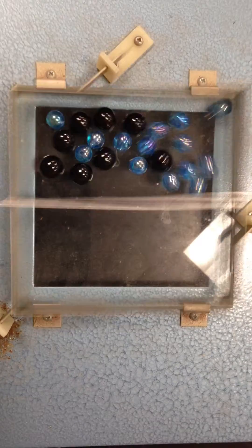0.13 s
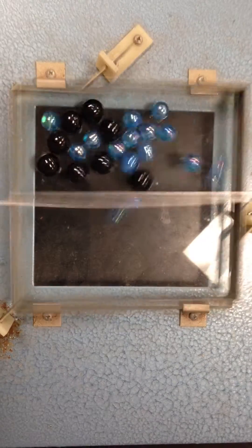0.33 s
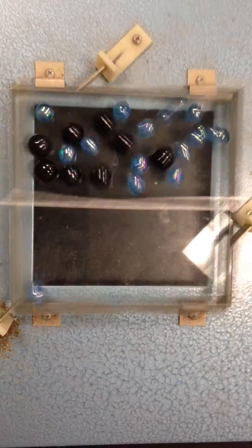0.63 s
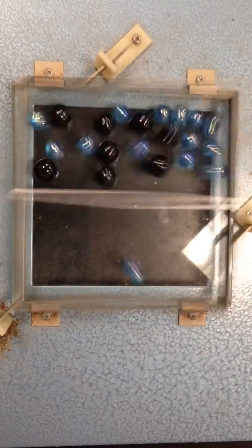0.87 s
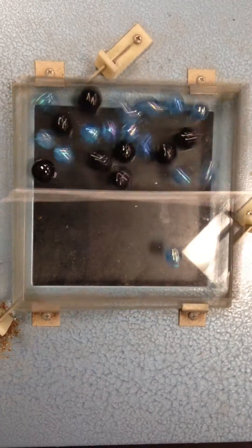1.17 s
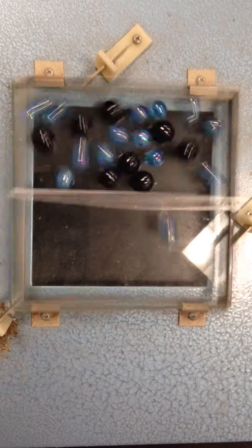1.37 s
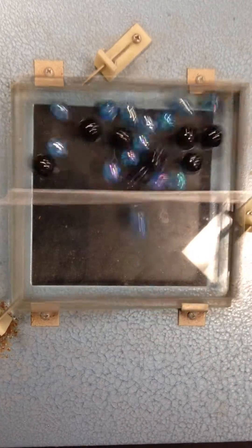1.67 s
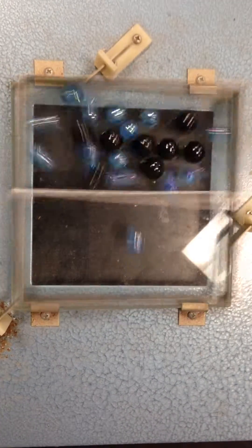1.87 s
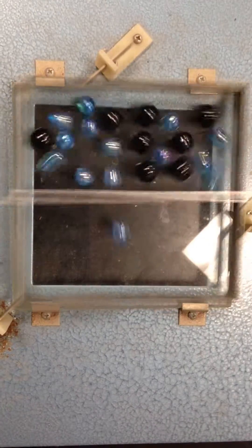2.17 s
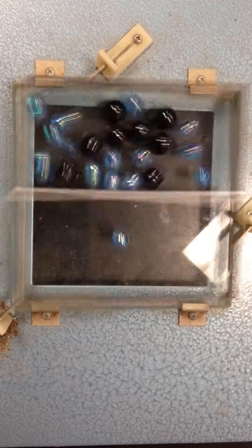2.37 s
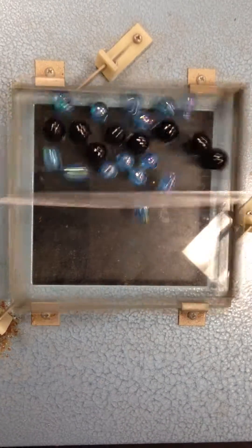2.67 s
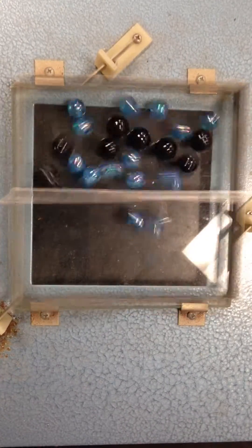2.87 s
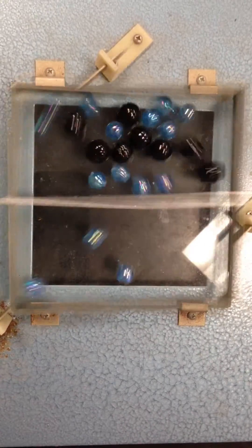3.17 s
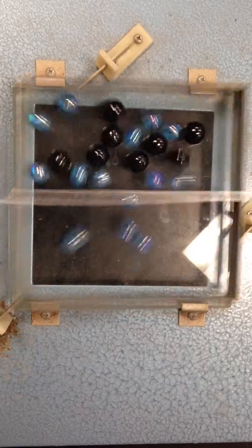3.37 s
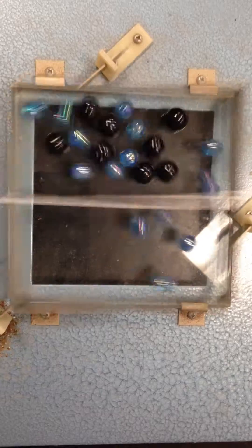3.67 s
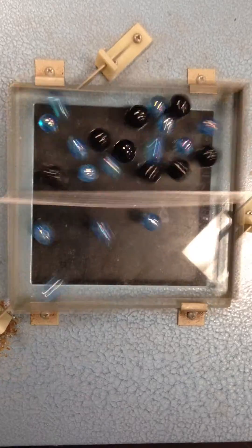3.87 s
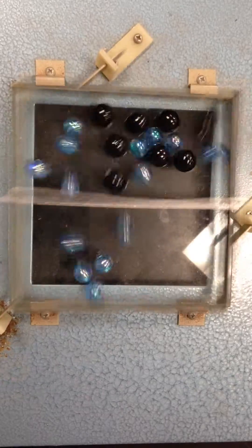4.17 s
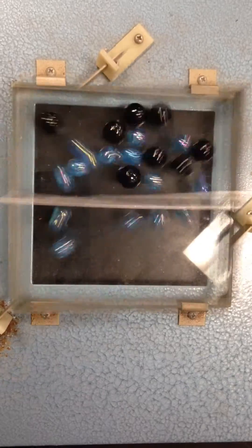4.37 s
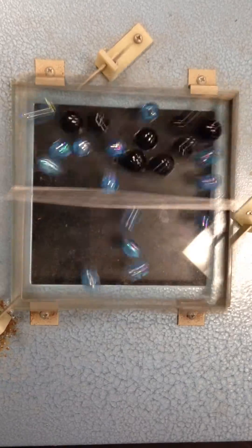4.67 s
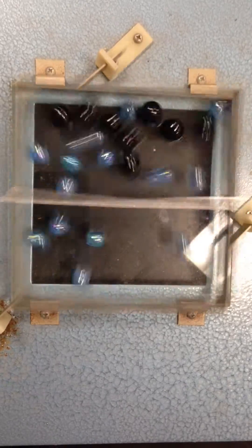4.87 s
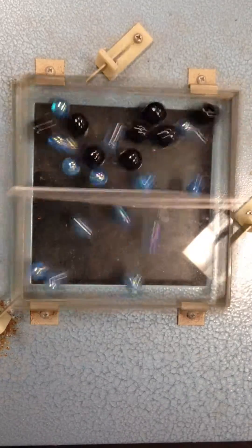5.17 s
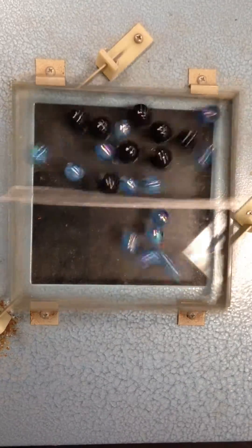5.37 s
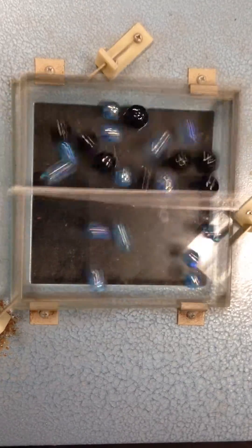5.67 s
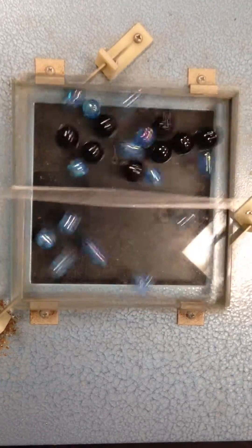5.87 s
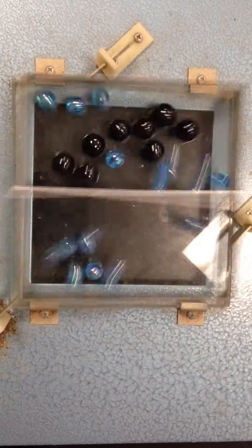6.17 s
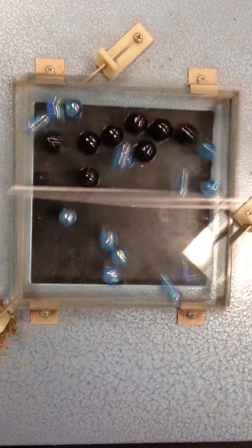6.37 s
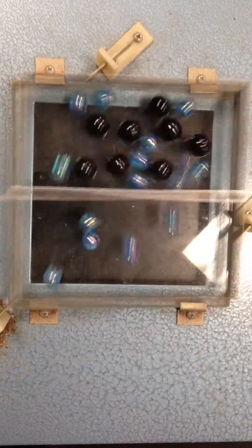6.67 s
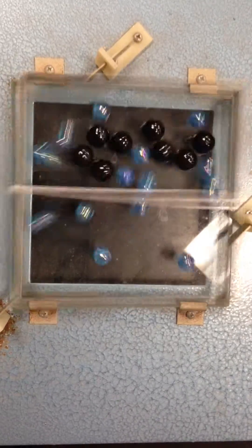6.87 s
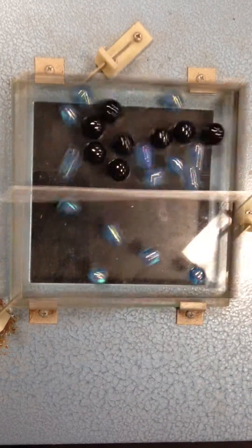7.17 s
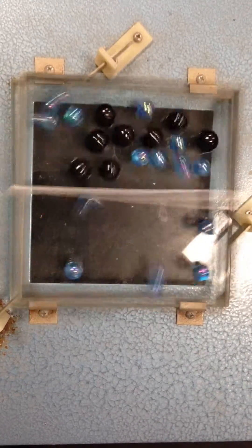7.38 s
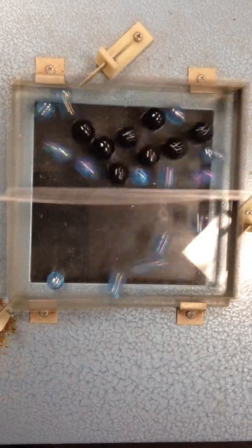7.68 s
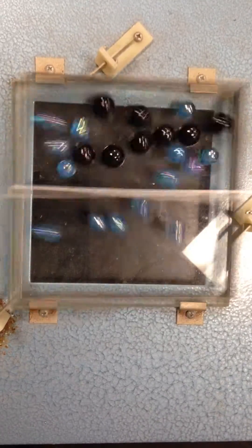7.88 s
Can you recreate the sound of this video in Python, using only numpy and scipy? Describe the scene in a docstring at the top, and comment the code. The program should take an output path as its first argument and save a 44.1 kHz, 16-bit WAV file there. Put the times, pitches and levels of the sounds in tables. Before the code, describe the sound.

From 0 seconds a motor-shaken tray of glass beads is already rattling, close to the microphone in a small room. The first half second is a little more packed and subdued, with drumming on the floor; then the beads loosen into a bright, hard, dense clatter. About fourteen strokes pass each second, each split into three quick volleys and a tiny lull, slightly uneven in pace. Bunches land together in sharper cracks, notably near 0.75, 3.35, 5.1, 7.15 and strongest around 7.4 seconds. Very high, thin metal pings ring briefly at irregular moments, clear near 0.25, 0.95, 2.6, 3.2, 6.2 and 7.75. Beneath lie a soft low thrum pulsing with the blows and a faint, steady, mid-pitched whine. The liveliness rises and dips slightly, and a short room tail fills the gaps. The rattle continues unbroken to the end at about 8 seconds.

```python
"""A hard, bright rattle in quick volleys: glass beads in a framed tray, shaken by a motor fourteen times a second.
Heard close up in a small room, with whole bunches landing at once, very high metal pings, a thrum and a thin whine.
Random clicks, more and harder with the power of each stroke, ring short noise bursts and the tray's resonances.
Pings are decaying sines; the thrum and whine are filtered noise; the room adds diffuse tails of noise.
The pings and the whine reach the microphone dry."""
import sys
import numpy as np
from scipy import signal
from scipy.fft import rfft, irfft, next_fast_len
from scipy.io import wavfile
from scipy.ndimage import uniform_filter1d, minimum_filter1d

SR = 44100
rng = np.random.default_rng(int(sys.argv[2]) if len(sys.argv) > 2 else 0)


def master(y):
    """Save y as 16-bit WAV."""
    cut = np.clip(np.atleast_2d(y).T, -1, 1)
    pcm = np.round(cut * 32767)  # scale
    wavfile.write(sys.argv[1], SR, pcm.astype(np.int16))


N = 353682
TIME = np.arange(N) / SR


def from_db(db):
    """Decibels to amplitude gain."""
    return 10 ** (np.asarray(db) / 20)


def rms_one(x):
    """Scale to unit rms."""
    return x / np.sqrt(np.mean(x ** 2) + 1e-20)


def coloured(x, spectrum, modes):
    """Give x a broad spectrum, then pass it through a chain of resonant peaks and dips."""
    hz, db = np.transpose(spectrum)
    size = next_fast_len(N + 4096)
    bins = np.maximum(np.fft.rfftfreq(size, 1 / SR), 1)
    gain = from_db(np.interp(np.log(bins), np.log(hz), db))
    x = irfft(rfft(x, size) * gain, size)[:N]
    for centre, width, gain_db in modes:
        b, a = signal.iirpeak(centre, centre / width, fs=SR)
        x = x + (from_db(gain_db) - 1) * signal.lfilter(b, a, x)
    return x


def dying_noise(t60):
    """A dense ring of unit energy: noise that falls by 60 dB in t60 seconds."""
    t = TIME[:int(t60 * SR) + 2]
    tail = rng.standard_normal(len(t)) * from_db(-60 * t / t60)
    return tail / np.linalg.norm(tail)


def room(x, t60, wet_db, count=8):
    """A diffuse tail follows the direct sound; different noise tails fade into one another in turn, shifting its colour."""
    turn = TIME * 20   # tails taken in turn, 20 a second
    wet = np.zeros(N)
    for k in range(count):
        share = np.maximum(0, 1 - abs((turn + k) % count - count / 2))
        tail = np.r_[np.zeros(SR // 200), dying_noise(t60)]   # the tail starts 5 ms late
        wet += signal.oaconvolve(x * np.sqrt(share), tail)[:N]
    return x + from_db(wet_db) * wet


# thin whine of the drive, one tone a row: pitch_hz, width_hz, level_db (rms)
WHINE_TONES = [(1077, 2, -37.5), (233, 8, -60), (359, 2, -59.5)]


def drive_whine():
    """Narrow, unsteady tones of the shaking mechanism: noise through very sharp resonances."""
    whine = np.zeros(N)
    for hz, width, db in WHINE_TONES:
        b, a = signal.iirpeak(hz, hz / width, fs=SR)
        tone = signal.lfilter(b, a, rng.standard_normal(N + SR))[SR:]   # a second to settle
        whine += from_db(db) * rms_one(tone)
    return whine


# relative broad spectrum of the driven base: pitch_hz, level_db
BASE_COLOUR = [(25, -41), (60, -29), (100, -26), (145, -8.5), (212, -12), (232, -1), (320, -1.5),
               (400, -1.5), (510, 10), (600, 7.5), (690, 9.5), (850, -39)]
# resonances of the base: pitch_hz, width_hz, gain_db
BASE_RESONANCES = [(220, 17, 3.2), (248.5, 26, 7.2), (358, 9.1, 2.7)]


def base_thrum(blow_power, level_db, steady):
    """The base booms softly under the drive, as noise swelling with the blows on the tray."""
    push = np.sqrt(steady + blow_power / blow_power.mean())
    boom = coloured(push * rng.standard_normal(N), BASE_COLOUR, BASE_RESONANCES)
    return from_db(level_db) * rms_one(boom)


def collisions():
    """For every instant: the chance that a bead hits, how hard (in standard deviations), and from which side."""
    chance = rng.random(N)
    hardness = np.clip(rng.standard_normal(N), -2, 2)
    side = rng.choice([-1, 1], N)
    return chance, hardness, side


def impacts(blows, per_s, spread_db):
    """Clicks of uneven size at random moments; rms 1."""
    chance, hardness, side = blows
    return rms_one(side * from_db(spread_db * hardness) * (chance < per_s / SR))


# clean hits on the ringing metal part: start_s, level_db (each varies a little at random)
METAL_HITS = [(0.246, -23), (0.55, -39), (0.937, -23), (1.077, -26.5), (1.809, -32), (2.144, -26),
              (2.628, -22), (3.221, -20), (3.631, -23), (4.35, -24), (4.603, -29), (4.945, -23),
              (5.086, -24), (5.363, -24), (5.934, -26), (6.212, -21), (6.71, -26), (6.818, -23),
              (7.096, -25), (7.765, -19.5)]
# modes of the metal part: pitch_hz, level_db, t60_s
METAL_MODES = [(11776, 0, .42), (12052, -5, .11), (12217, -6, .14), (12490, -10, .22)]


def metal_pings(glass_power, hit_db, graze_db):
    """Clean hits and many light grazes keep the high modes of the metal ringing, each a decaying sine."""
    s, db = np.transpose(METAL_HITS)
    out = np.zeros(N)
    for hz, level_db, t60 in METAL_MODES:
        grazes = impacts(collisions(), 45, spread_db=6.0) * np.sqrt(glass_power)
        clicks = from_db(graze_db) * grazes
        clicks[(s * SR).astype(int)] += from_db(db + hit_db + rng.normal(0, 1.1, len(s)))
        r, w = from_db(-60 / (t60 * SR)), 2 * np.pi * hz / SR   # decay and turn per sample
        b, a = [0, np.sin(w)], [1, -2 * r * np.cos(w), r * r]
        out += from_db(level_db) * signal.lfilter(b, a, clicks + 1e-18)
    return out


SHAKE_HZ = 14.17
PACKED_DB, PACKED_UNTIL_S = 3, .55   # at first the beads lie packed and drum harder on the floor
# relative impact power through one stroke, three volleys and a lull:
# stroke_share (0 to 1), floor_db, frame_db, glass_db (glass on glass)
STROKE_POWER = [(0.01, -31, -29.5, -34.5), (0.119, -24.5, -21.5, -25.5), (.21, -28, -25.5, -25.5),
                (.34, -24, -20, -22), (.43, -27, -22, -24.5), (0.522, -33.5, -25, -25),
                (.64, -23.5, -18, -24.5), (.75, -26.5, -24, -23.5), (.87, -30, -26, -26.5)]
# how lively the beads are: start_s, level_db
LIVELINESS = [(0.0, -3.5), (0.2, -1.63), (1.3, 1.0), (1.4, -1.6), (1.8, 1.9), (2.3, -3), (2.4, 0.5),
              (2.7, -1.5), (3.3, 1.2), (3.4, -2.3), (3.6, 0.9), (4.1, -1.3), (4.7, 1.0), (5.5, 1.5),
              (5.6, -1.03), (6.5, 1.24), (6.6, -1.6), (7.0, 1.4), (7.1, 0.45), (8.0, 1.1)]
# the motor runs slightly unevenly, so the strokes come early or late: start_s, delay_s
STROKE_TIMING = [(0, -0.0076), (.75, -0.00066), (1.4, -0.0027), (2.4, 0.0093), (2.9, 0.000038),
                 (3.85, 0.0079), (4.3, -0.0033), (5.1, -0.0064), (5.5, -.0005), (6.1, -0.0047),
                 (6.7, -0.00035), (7.3, 0.0075)]


def volleys():
    """Power that the strokes feed to tray floor, frame and glass, following the liveliness of the beads."""
    phase, *levels_db = np.transpose(STROKE_POWER)
    delay = np.interp(TIME, *np.transpose(STROKE_TIMING))
    stroke = (TIME - delay) * SHAKE_HZ % 1
    power = np.array([np.interp(stroke, phase, from_db(db) ** 2, period=1) for db in levels_db])
    power[0] *= from_db(PACKED_DB * (TIME < PACKED_UNTIL_S)) ** 2
    return power * from_db(np.interp(TIME, *np.transpose(LIVELINESS))) ** 2


def landings(bunches, bunch_s):
    """Power of bunches (start_s, floor_db, frame_db, glass_db); the beads of each arrive a few ms apart."""
    power = np.zeros((3, N))
    for s, *levels_db in bunches:
        near = slice(*np.searchsorted(TIME, [s - 5 * bunch_s, s + 5 * bunch_s]))
        swell = np.exp(-.5 * ((TIME[near] - s) / bunch_s) ** 2)
        power[:, near] += np.outer(from_db(levels_db) ** 2, swell)
    return power


# small bunches land at random and carry a share of the volleys' power
BUNCHES_PER_S, BUNCH_SHARE = 60, .3
BUNCH_SIZE_DB, BUNCH_AIM_DB = 2.5, 2.5   # random spread in size and in what they hit
# the loudest bunches of beads landing together, relative power:
# start_s, floor_db, frame_db, glass_db (glass on glass)
LOUD_CLATTERS = [(0.011, -13.5, -15, -29.5), (0.042, -14.5, -17.0, -37), (0.114, -31, -11, -26),
                 (0.188, -16, -18.5, -34), (0.326, -25, -10.5, -25), (0.378, -23, -16, -14),
                 (0.397, -26, -15.5, -16), (0.443, -12, -11, -23), (0.474, -36, -17, -21),
                 (0.516, -18.5, -11, -11), (0.536, -16.5, -24.5, -28), (0.746, -18, -8, -25.0),
                 (0.822, -23.5, -12.5, -15), (0.962, -18.5, -13.5, -32.0), (1.084, -22, -17, -12.5),
                 (1.247, -18.5, -16.5, -27), (1.368, -21, -14.5, -23), (1.387, -18, -19.5, -19),
                 (1.412, -33, -16, -27), (1.672, -20.5, -17.5, -17), (1.883, -21.0, -17, -20.0),
                 (2.002, -22.5, -13.5, -15.0), (2.046, -26, -13.0, -23), (2.163, -20.5, -15.0, -26),
                 (2.19, -23, -15.0, -24.0), (2.359, -27, -14.5, -16), (2.381, -28, -14.5, -16),
                 (2.449, -21, -14, -31), (2.52, -25, -15, -14), (2.66, -36, -18, -33),
                 (2.822, -27, -12, -24.0), (2.943, -18, -18.5, -20), (3.015, -19.5, -13.5, -34),
                 (3.218, -20, -15.0, -17), (3.346, -10.5, -12.5, -14), (3.436, -34, -12, -16),
                 (3.979, -36, -15.5, -22), (4.564, -19, -14.0, -27), (4.7, -15.5, -12.5, -17),
                 (4.984, -13.5, -13.5, -29), (5.053, -18.5, -12.5, -16), (5.123, -30, -12, -15),
                 (5.267, -16.5, -12, -21), (5.344, -19, -17.5, -23.0), (5.969, -25, -15, -21.0),
                 (6.135, -22, -13.5, -27), (6.303, -16.5, -17, -22), (6.325, -28, -11.5, -16),
                 (6.375, -14.5, -17.5, -22), (6.534, -16.5, -13.5, -27), (6.557, -37, -12.5, -24),
                 (6.609, -20, -18.5, -26.0), (6.728, -14.5, -17, -27.0), (6.796, -30, -13.5, -17.5),
                 (6.82, -20.5, -16.5, -22), (7.029, -17.5, -15.5, -34), (7.104, -17.5, -18.5, -22),
                 (7.153, -25.0, -10, -16), (7.174, -15, -12.5, -14), (7.385, -12, -7.5, -16),
                 (7.672, -14.5, -26, -22), (7.787, -22.5, -15, -30), (7.811, -33.0, -14, -25)]


def impact_power(bunch_s, clatter_db, count=1000):
    """The volleys break up into small chance bunches; the loud clatters come on top."""
    s = (np.arange(count) + rng.random(count)) / BUNCHES_PER_S
    chance = np.clip(rng.standard_normal((count, 4)), -2, 2)
    levels_db = BUNCH_SIZE_DB * chance[:, :1] + BUNCH_AIM_DB * chance[:, 1:]
    small = landings(np.c_[s, levels_db], bunch_s)
    broken_up = volleys() * (1 - BUNCH_SHARE + BUNCH_SHARE * small / small.mean())
    return broken_up + from_db(clatter_db) ** 2 * landings(LOUD_CLATTERS, bunch_s)


def accented(power, contrast):
    """Widen (above 1) or narrow (below 1) the gap between hard and soft blows; the mean power stays."""
    shaped = power ** contrast
    return shaped * power.mean() / shaped.mean()


def chatter(clicks, t60, ring_db, patchy_db, size=384):
    """Every few milliseconds the blows fall on another spot, which answers with a short ring of its own pitch mix."""
    spots = np.pad(clicks, (0, -N % size)).reshape(-1, size)
    length = 6 * size
    # each spot's pitch mix: a random curve over frequency, patchy_db its spread
    knots = rng.standard_normal((len(spots), 64))
    place = np.sqrt(np.linspace(0, 1, length // 2 + 1)) * (knots.shape[1] - 1)
    curves = np.array([np.interp(place, np.arange(len(k)), k) for k in knots])
    tint = from_db(patchy_db * curves)
    noise = rng.standard_normal((len(spots), length))
    rings = irfft(rfft(noise) * tint) * from_db(-60 * TIME[:length] / t60)
    rings *= from_db(ring_db) / np.linalg.norm(rings, axis=1, keepdims=True)
    rings[:, 0] += 1   # the sharp contact itself
    out = np.zeros(spots.size + length)
    for k, burst in enumerate(signal.fftconvolve(spots, rings, axes=1)):
        out[k * size:k * size + len(burst)] += burst
    return out[:N]


def evened(sound, power, hold_s, evenness, size=441):
    """The beads share the energy fed in, so their joint loudness follows it closely, lagging while the tray rings."""
    r = np.exp(-1 / (hold_s * SR))
    stored = signal.lfilter([1 - r], [1, -r], power)
    window = signal.windows.hann(2 * size) / size
    fed = signal.oaconvolve(stored, window, "same")
    sounding = signal.oaconvolve(sound ** 2, window, "same")
    return sound * (fed / (abs(sounding) + 1e-9)) ** (evenness / 2)


# relative broad spectrum of an impact: pitch_hz, level_db
IMPACT_COLOUR = [(400, -20), (650, -13.5), (800, -2), (1400, -7), (2000, -10.5), (2700, -15), (4000, -12.5),
                 (6000, -17), (8000, -15.5), (11000, -20), (13100, -20), (14200, -16), (15200, -24.5)]
# resonances and antiresonances of tray and frame: pitch_hz, width_hz, gain_db
TRAY_RESONANCES = [(507, 62, 4.8), (792, 60, 6.2), (857, 51, 9.5), (973, 42, 5.2), (1337, 100, 5.8),
                   (1460, 40, 3.3), (1792, 133, 5.6), (2087, 42, 9.7), (2147, 75, 7.2), (2308, 100, -5.9),
                   (2529, 114, 5.4), (3056, 68, 8.3), (3197, 93, 8.3), (3427, 82, -4.2), (3662, 202, 3.9),
                   (3922, 122, 5.1), (4289, 116, 4.5), (5408, 133, 7.0), (6017, 99, 2.9), (7120, 128, 3.5),
                   (7303, 45, 4.6), (7600, 240, 2.9), (8429, 202, 2.6), (9468, 168, 5.1), (10624, 57, 3.8),
                   (11900, 200, 5), (12055, 50, 10), (12217, 35, 11)]


def rattle(blows, power, band_hz, per_s, spread_db, ring_t60, ring_db, patchy_db, hold_s, evenness):
    """One kind of contact: with more power the beads hit both more often and harder."""
    vigour = np.sqrt(power / power.mean())
    clicks = impacts(blows, per_s * vigour, spread_db) * np.sqrt(vigour)
    ringing = chatter(clicks, ring_t60, ring_db, patchy_db)
    band = signal.butter(4, band_hz, "band", fs=SR, output="sos")
    sound = coloured(signal.sosfilt(band, ringing), IMPACT_COLOUR, TRAY_RESONANCES)
    return evened(np.sqrt(power.mean()) * rms_one(sound), power, hold_s, evenness)


def scene():
    """The same blows knock on the floor, clack on the frame and tick in the glass; the metal rings, the drive hums."""
    floor, frame, glass = impact_power(bunch_s=.0024, clatter_db=-0.5)
    thrum = base_thrum(floor + frame, level_db=-40.5, steady=.05)
    pings = metal_pings(glass, hit_db=0.0, graze_db=-42.5)
    blows = collisions()
    knocks = from_db(1.5) * rattle(
        blows, floor, band_hz=(670, 1200), per_s=1500, spread_db=2.0,
        ring_t60=0.015, ring_db=-2.0, patchy_db=3.5, hold_s=0.0011, evenness=0.54)
    # heavy blows flex the whole frame in short clacks; its higher modes ring on more evenly
    clacks = from_db(-4.0) * rattle(
        blows, accented(frame, contrast=1.1), band_hz=(1200, 1980), per_s=1000, spread_db=3.0,
        ring_t60=0.024, ring_db=-0.5, patchy_db=3.5, hold_s=0.0017, evenness=0.9)
    clinks = from_db(-1.0) * rattle(
        blows, accented(frame, contrast=.88), band_hz=(1980, 6000), per_s=1400, spread_db=2.0,
        ring_t60=0.043, ring_db=1.0, patchy_db=-0.5, hold_s=0.0044, evenness=0.65)
    ticks = from_db(0.6) * rattle(
        blows, glass, band_hz=(6000, 17000), per_s=1400, spread_db=2.0,
        ring_t60=0.041, ring_db=4.5, patchy_db=3.5, hold_s=0.0026, evenness=0.46)
    in_room = room(knocks + clacks + clinks + ticks + thrum, t60=0.67, wet_db=-8.5)
    return (in_room + pings + drive_whine())[None]


def limiter(x, ceiling_db, size=220):
    """The gain ducks for a few milliseconds around any peak above the ceiling."""
    gain = np.minimum(1, from_db(ceiling_db) / (abs(x) + 1e-9))
    return x * uniform_filter1d(minimum_filter1d(gain, size), size)


CUTOFF_HZ = 15300


def record(dry):
    """The highest peaks are limited and the top is cut steeply."""
    limited = limiter(dry, ceiling_db=-3.8)
    low_pass = signal.ellip(12, .1, 80, CUTOFF_HZ, fs=SR, output="sos")
    return signal.sosfilt(low_pass, limited)


dry = scene()
out = record(dry)
master(out)
```